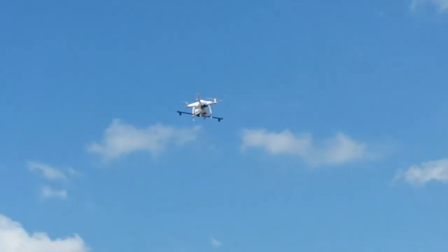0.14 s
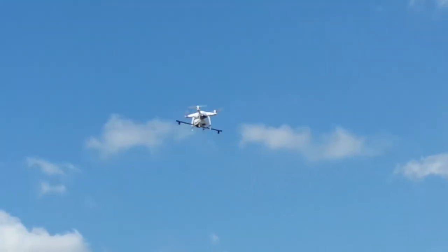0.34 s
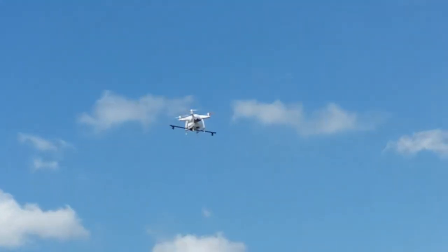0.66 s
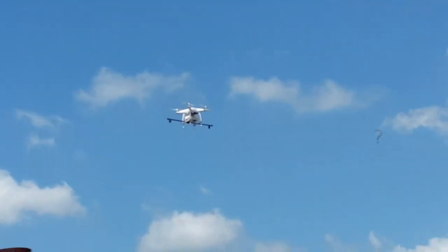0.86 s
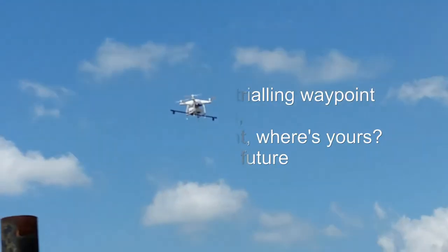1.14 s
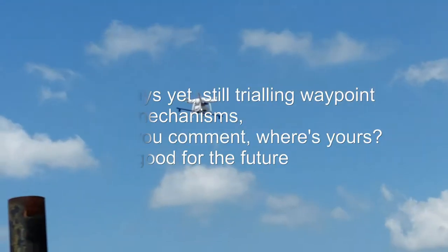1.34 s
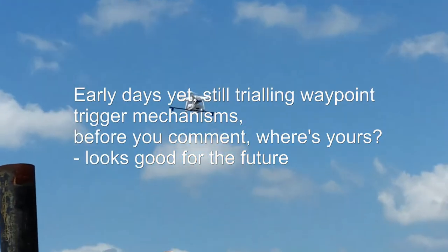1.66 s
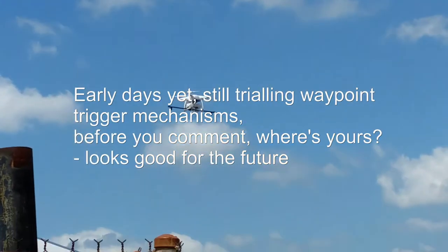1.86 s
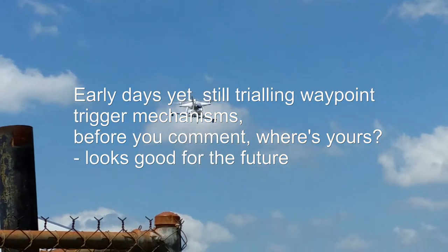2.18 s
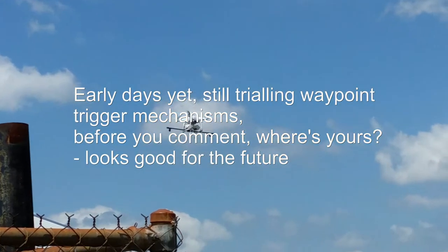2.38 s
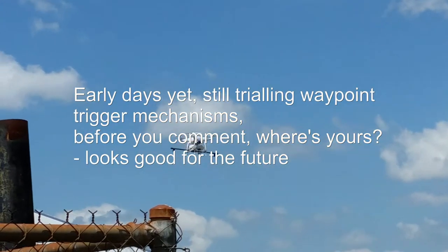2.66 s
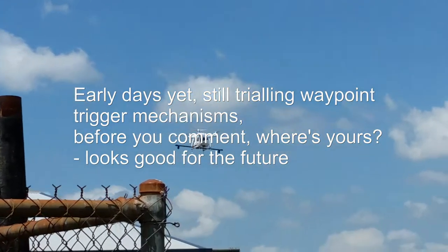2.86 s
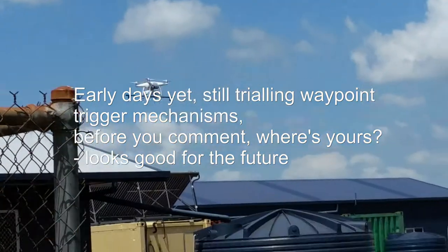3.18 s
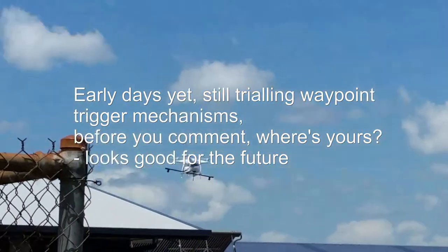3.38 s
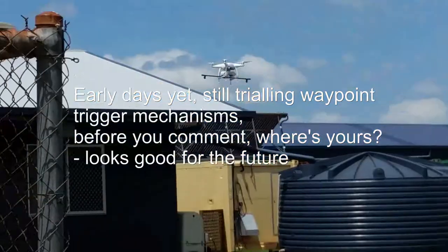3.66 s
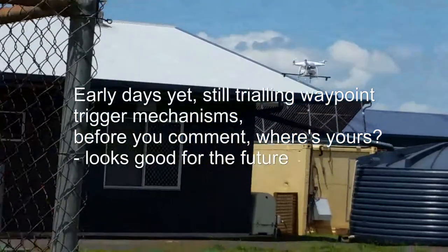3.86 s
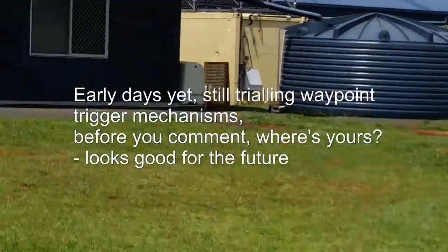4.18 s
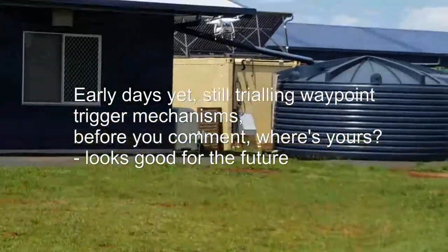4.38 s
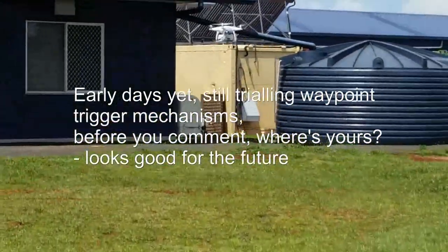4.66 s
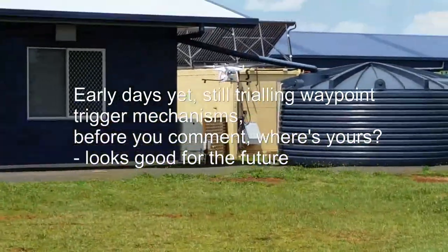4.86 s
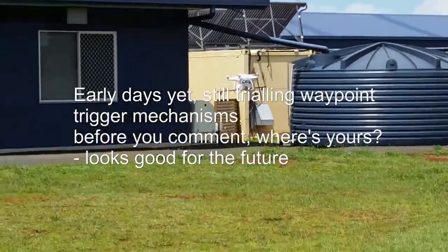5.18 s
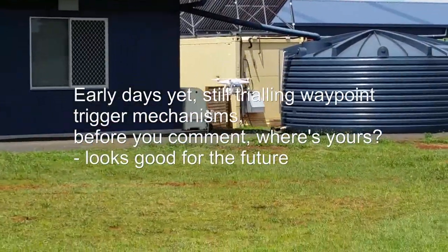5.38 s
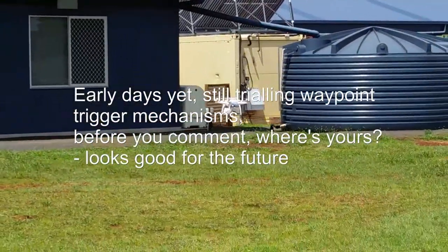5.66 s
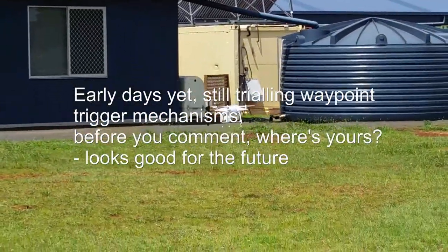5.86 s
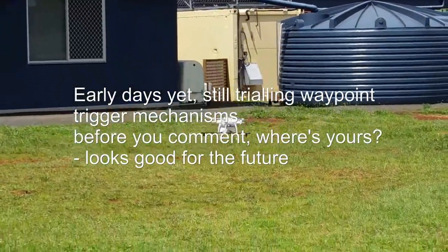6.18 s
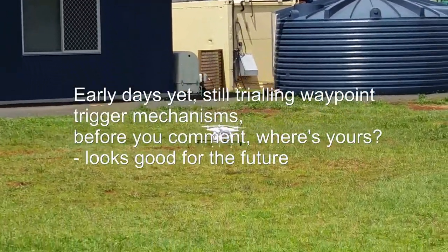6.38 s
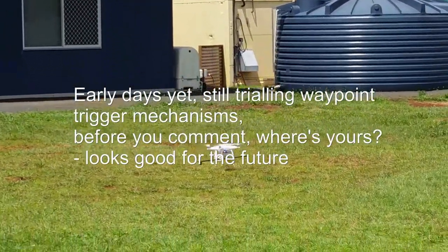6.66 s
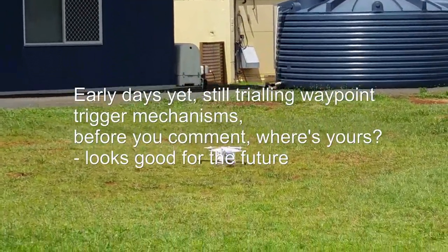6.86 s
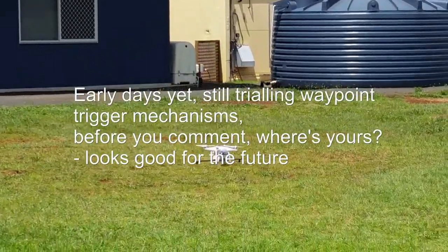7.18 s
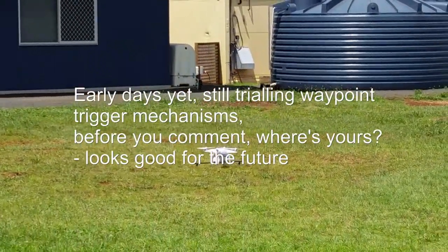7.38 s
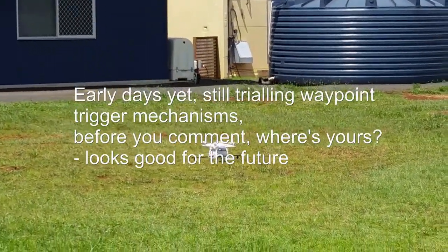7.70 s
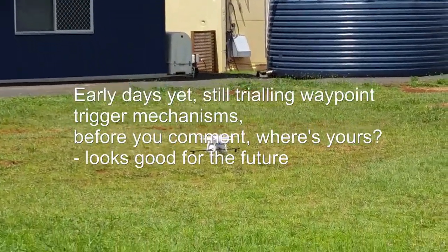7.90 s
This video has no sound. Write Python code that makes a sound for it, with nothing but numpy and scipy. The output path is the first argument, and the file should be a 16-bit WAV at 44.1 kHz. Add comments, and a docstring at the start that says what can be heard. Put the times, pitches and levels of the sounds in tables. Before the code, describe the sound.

The buzzing propellers of a small drone waver outdoors and wind down on landing, while gusts buffet the microphone.

```python
"""Over a lawn, a few metres away, a small four-rotor drone sinks, touches down and throttles back.
Each rotor hums at harmonics of its wavering blade rate and hisses at the tips; the motor housings ring.
The ground echo interferes with the direct sound, a comb filter that shifts as the craft descends.
Wind buffets the left and right microphone each on its own; a bird chirps once over a distant hiss."""
import sys
import numpy as np
from scipy import signal
from scipy.fft import rfft, irfft, next_fast_len
from scipy.io import wavfile
from scipy.ndimage import map_coordinates

SR = 44100
rng = np.random.default_rng(int(sys.argv[2]) if len(sys.argv) > 2 else 0)


def wrap_up_sound(samples):
    """Save the sound to the file named by the first command line argument, as 16-bit audio."""
    columns = np.atleast_2d(samples).T
    # keep every value between -1 and 1, then stretch to whole-number steps
    tamed = np.clip(columns, -1, 1)
    steps = np.round(tamed * 32767).astype(np.int16)
    wavfile.write(sys.argv[1], SR, steps)


N = 354123
HOVER_HZ = 230   # reference blade rate
STEP = 40   # samples between the values of a slow curve
SLOW_TIME = np.arange(N // STEP + 2) * STEP / SR


def from_db(db):
    """Amplitude ratio of a level in decibels."""
    return 10 ** (np.asarray(db) / 20)


def rms_one(x):
    """Normalisation to unit rms."""
    return x / np.sqrt(np.mean(x ** 2) + 1e-20)


def in_time(rows):
    """Linear interpolation of a table's columns at every sample."""
    times, *columns = np.transpose(rows)
    return [np.interp(np.arange(N) / SR, times, column) for column in columns]


def filled(slow):
    """Linear interpolation of a slow curve at every sample."""
    return np.interp(np.arange(N) / STEP, np.arange(len(slow)), slow)


def drift(corner_hz):
    """Random modulation: a slow curve of unit rms, from noise through two one-pole low-passes."""
    pole = np.exp(-2 * np.pi * STEP * corner_hz / SR)
    noise = rng.standard_normal(len(SLOW_TIME) + 2000)
    return rms_one(signal.lfilter([1], [1, -2 * pole, pole * pole], noise)[2000:])


def coloured(x, points, column=1):
    """Spectral shaping by a table of gain against frequency."""
    size, table = next_fast_len(N + 4096), np.array(points)
    log_hz = np.log(np.arange(size // 2 + 1) * SR / size + 1)
    gain = from_db(np.interp(log_hz, np.log(table[:, 0]), table[:, column]))
    return irfft(rfft(x, size) * gain, size)[..., :N]


def delayed(x, lag_s):
    """Propagation delay, constant or varying."""
    return np.interp(np.arange(N) - lag_s * SR, np.arange(N), x)


def resonance(x, hz, width_hz):
    """Two-pole resonator with unit peak gain."""
    r = np.exp(-np.pi * width_hz / SR)
    gain = (1 - r * r) / 2
    return signal.lfilter([gain, 0, -gain], [1, -2 * r * np.cos(2 * np.pi * hz / SR), r * r], x)


def glides(rows):
    """Linear frequency sweeps under Hann envelopes."""
    out = np.zeros(N)
    for start_s, length_s, start_hz, end_hz, db in rows:
        n, at = round(length_s * SR), round(start_s * SR)
        phase = 2 * np.pi * np.cumsum(np.linspace(start_hz, end_hz, n)) / SR
        out[at:at + n] += from_db(db) * np.hanning(n) * np.sin(phase)
    return out


def blade_rates():
    """Blade-passing frequencies: each swings as the craft balances, and the throttle scales all four."""
    # one list per rotor, at flying throttle: (time [s], blade rate [Hz])
    rotors = [
        [(0, 210), (.34, 195), (.7, 224), (.9, 218.5), (1.1, 225), (1.42, 219.5), (1.72, 218), (2.1, 200.5),
         (2.4, 214), (2.78, 215.5), (2.95, 221), (3.15, 221.5), (3.4, 214.5), (3.7, 229), (3.97, 232),
         (4.3, 230), (4.45, 231.5), (4.62, 228), (4.78, 224.5), (5.2, 235.5), (5.5, 235), (5.65, 228.5),
         (5.82, 232), (6, 225.5), (6.23, 231), (6.6, 229), (7.03, 228)],
        [(0, 219.5), (.26, 228), (.52, 223.5), (.72, 228.5), (.86, 226.5), (1, 228.5), (1.25, 222),
         (1.45, 226.5), (1.65, 225), (2.2, 228.5), (2.6, 226), (3.08, 224.5), (3.27, 220.5), (3.45, 225),
         (3.65, 230.5), (3.9, 224.5), (4.12, 230), (4.36, 212.5), (4.62, 228), (5.04, 214.5), (5.26, 225),
         (5.52, 226), (5.76, 231), (5.98, 222), (6.25, 232), (6.55, 221.5), (6.9, 229), (7.03, 227)],
        [(0, 241), (.4, 228.5), (.66, 237), (.9, 230.5), (1.2, 226), (1.5, 230.5), (2.1, 233), (2.5, 232),
         (2.75, 226.5), (3.14, 226.5), (3.37, 234.5), (3.55, 228), (3.72, 231), (3.95, 234), (4.1, 233),
         (4.27, 238.5), (4.63, 213.5), (5, 234.5), (5.25, 241), (5.53, 252), (5.83, 238.5), (6.21, 254.5),
         (6.5, 233), (6.7, 237.5), (6.9, 229), (7.03, 230)],
        [(0, 232), (.42, 243), (.62, 242), (.84, 247.5), (1.25, 247.5), (1.6, 241.5), (1.9, 244.5), (2.2, 241),
         (2.7, 245.5), (3, 246), (3.27, 252), (3.62, 244.5), (3.85, 246.5), (4.17, 240), (4.53, 250),
         (4.75, 247), (5, 234), (5.39, 213), (5.73, 229), (6.17, 213), (6.42, 228), (6.8, 226), (6.9, 209),
         (6.97, 206), (7.03, 205)],
    ]
    # cut on touchdown, then eased up: (time [s], share of flying speed [ratio])
    throttle = [(6.94, 1), (7.03, .97), (7.07, .91), (7.14, .88), (7.3, .72), (7.5, .652), (7.78, .665),
                (8.03, .715)]
    rates = []
    for times, hz in map(np.transpose, rotors):
        position = np.interp(SLOW_TIME, times, np.arange(len(times)))
        swing_hz = map_coordinates(hz, [position], order=3, mode="nearest")
        rates.append(filled(swing_hz) * in_time(throttle)[0])
    return rates


def blade_angles(wobble_hz):
    """Phase is the integral of frequency, one cycle per blade pass; the speed control hunts a little."""
    return [2 * np.pi * (np.cumsum(hz + wobble_hz * filled(drift(11.14))) / SR + rng.random())
            for hz in blade_rates()]


def rotor_hum(angles, flutter_db, rough_db):
    """Periodic blade passes radiate a harmonic series; stirred air modulates each partial's amplitude."""
    # partials of one rotor: (multiple of the blade rate [ratio], level [dB])
    partials = [(.5, -17), (1, -2.8), (2, -2.5), (3, -6), (4, -4.5), (5, -9.5), (6, -11), (7, -12.5),
                (8, -11.5), (9, -15.5), (10, -18), (11, -23)]
    # shading of the far rotors by the body: (time [s], level of rotor 1, 2, 3, 4 [dB])
    shading = [(.4, -11.5, -3.5, -3.5, -13), (.9, -9.5, -4.5, -5, -14.5), (1.8, -14.5, -7.5, -7, -13.5),
               (2.6, -15.5, -6, -8.5, -15.5), (3.6, -11, -6, -5.5, -12), (4.3, -12.5, -6.5, -6.5, -10),
               (5.3, -10, -4, -11, -8.5), (6.4, -7.5, -1.5, -8, -6), (7.02, -5.5, -5.5, -14, -6),
               (7.07, -11.5, -12.5, -3, -1), (7.4, -18, -8, -13, -2)]
    # the low harmonics swell and thin: (time [s], gain of harmonic 1, 2, 3 [dB])
    low_harmonics = [(0, 6, -0.5, -4), (.8, 0.5, -4, 0), (1.3, 5, -2.5, 4.5), (2.2, -2, 3, 0.5),
                     (3, -8, 2.5, 1), (3.8, -4.5, 2.5, -3.5), (4.6, -3.5, 0, 1.5), (5.5, 0.5, -1, 3),
                     (6.3, -2.5, -7, -4), (6.9, 6.5, -3.5, 2.5)]
    # how strongly each rotor's fundamental arrives: (gain [dB])
    fundamentals = [1.5, -6, 2.5, 3]
    swells = dict(zip((1, 2, 3), from_db(in_time(low_harmonics))))
    out = 0
    for angle, rotor_db, hz, first_db in zip(angles, in_time(shading), blade_rates(), fundamentals):
        tones = 0
        for multiple, db in partials:
            level_db = db + first_db * (multiple == 1) + flutter_db * drift(4.9) + rough_db * drift(25)
            amplitude = swells.get(multiple, 1) * filled(from_db(level_db))
            tones += amplitude * np.sin(multiple * angle + 2 * np.pi * rng.random())
        speed_db = 10 * np.log2(hz / HOVER_HZ)   # a faster rotor is louder
        out += from_db(rotor_db + speed_db) * tones
    return out


def blade_noise(angles, spectrum, blade_depth, turn_depth, coherence):
    """Noise modulated by each pass, one blade more than the other; partly coherent left and right."""
    swells = np.array([np.exp(blade_depth * np.cos(a) + turn_depth * np.cos(a / 2)) for a in angles])
    envelope = np.sqrt(np.sum(swells ** 2, axis=0))   # incoherent sources add in power
    shared, left, right = rng.standard_normal((3, N))
    noise = np.sqrt(coherence) * shared + np.sqrt(1 - coherence) * np.array([left, right])
    return rms_one(coloured(envelope * noise, spectrum))


def ground_echo(direct):
    """Reflection from grass, which absorbs treble; the path difference shrinks as the craft sinks."""
    # reflected path: (time [s], lag [ms], strength [ratio])
    reflection = [(0, 3.48, .3), (1, 3.22, 0.34), (2, 2.76, 0.06), (2.9, 2.08, 0.06), (3.4, 1.78, 0.22),
                  (4.3, 1.385, 0.3), (5.1, 1.16, 0.49), (5.5, 0.98, 0.29), (6.1, 0.72, 0.12),
                  (6.7, 0.47, 0.1), (7, 0.35, 0.4), (8.03, 0.46, 1)]
    lag_ms, strength = in_time(reflection)
    dull = signal.sosfilt(signal.butter(1, 3500, fs=SR, output="sos"), direct)
    return strength * np.array([delayed(side, lag_ms / 1000) for side in dull])


def motor_whine(angles, flicker_db, bearing_noise):
    """Forced resonance: blade-pass pulses and bearing noise ring two modes of the motor housings."""
    # housing modes: (frequency [Hz], bandwidth of each filter stage [Hz], level [dB])
    modes = [(5415, 100, 0), (5715, 120, 0)]
    # brief flares of the upper mode: (time [s], rise [dB])
    flares = [(.12, 6), (.56, 6), (.97, 5), (1.24, 5), (1.95, 5), (2.19, 10), (3.1, 7), (3.46, 7),
              (3.8, 11)]
    pulses = rms_one(sum(np.sin(45.5 * a) / (np.sin(a / 2) + 1e-9) for a in angles))   # 45 harmonics
    force = pulses + bearing_noise * rng.standard_normal(N)
    rings = []
    for hz, width_hz, db in modes:
        ring = rms_one(resonance(resonance(force, hz, width_hz), hz, width_hz))
        rings.append(filled(from_db(db + flicker_db * drift(7.4))) * ring)
    lower, upper = rings
    flare_db = sum(db * np.exp(-((SLOW_TIME - at_s) / 0.048) ** 2 / 2) for at_s, db in flares)
    return lower + from_db(filled(flare_db)) * upper


def tip_hiss(angles, split_hz):
    """Directivity: the tips beam their hiss, so it swings with tilt; its top fades as the blades slow."""
    # tip noise: (frequency [Hz], relative spectral density [dB])
    spectrum = [(3000, -16), (6000, -19.5), (10000, -1.5), (13000, -10.5), (16000, -15.5)]
    # hiss beamed at the listener: (time [s], level [dB])
    beam = [(0, -43.5), (.13, -41), (.2, -44.5), (.55, -46), (.72, -40.5), (.87, -42.5), (1.22, -44),
            (1.55, -48.5), (1.68, -42.5), (1.82, -46.5), (2.2, -47), (2.33, -43), (2.64, -43.5),
            (2.78, -45), (3.4, -48), (3.52, -41.5), (3.8, -39.5), (3.95, -44.5), (4.02, -46.5), (4.25, -45),
            (5.15, -47.5), (5.57, -46), (5.8, -49.5), (6.1, -51), (6.2, -44), (6.99, -40), (7.14, -48),
            (7.3, -59.5), (7.58, -51.5), (8.03, -49)]
    hiss = blade_noise(angles, spectrum, blade_depth=0.44, turn_depth=0.17, coherence=0.47)
    top = signal.sosfilt(signal.butter(2, split_hz, "high", fs=SR, output="sos"), hiss)
    speed = np.mean(blade_rates(), axis=0) / HOVER_HZ
    level_db = in_time(beam)[0] + filled(drift(7.3))
    return from_db(level_db) * (hiss + 2.5 * speed ** 8.5 * top)


def drone():
    """Superposition of the craft's sources; hum and blade noise interfere with their ground echo."""
    # source gains over the flight: (time [s], hum [dB], blade noise [dB], whine [dB])
    flight = [(0, -43.5, -46, -63), (2, -40.5, -49.5, -62.5), (4, -39.5, -50.5, -63.5), (5, -40, -53, -60),
              (6, -41, -49.5, -60.5), (6.5, -41, -47.5, -56.5), (6.85, -45, -49.5, -54),
              (6.99, -44.5, -58, -52), (7.05, -54.5, -55, -53), (7.3, -60, -59, -58), (7.55, -52, -60, -67),
              (8.03, -52, -60, -62)]
    # broadband blade noise: (frequency [Hz], relative spectral density [dB])
    spectrum = [(150, -44.5), (400, -0.5), (1000, -3.5), (2000, 0), (3500, -6.5), (6000, -56),
                (9000, -18.5)]
    hum_gain, swish_gain, whine_gain = from_db(in_time(flight))
    angles = blade_angles(wobble_hz=0.35)
    hum = hum_gain * rotor_hum(angles, flutter_db=1.8, rough_db=0.9)
    swish = swish_gain * blade_noise(angles, spectrum, blade_depth=0.42, turn_depth=0.084, coherence=0.67)
    motors = whine_gain * motor_whine(angles, flicker_db=3, bearing_noise=2.3) + motor_slides(flicker_db=3)
    left, right = hum + swish + ground_echo(hum + swish) + tip_hiss(angles, split_hz=15400) + motors
    return np.array([left, delayed(right, lag_s=7.7e-5)])   # sound reaches the right side later


def distant_hiss(level_db):
    """Ambient noise: steady, and incoherent between left and right."""
    # outdoor background: (frequency [Hz], relative spectral density [dB])
    spectrum = [(150, 9), (1300, 1), (2500, 1), (5000, -2), (10000, -40.5), (16000, -15)]
    return from_db(level_db) * rms_one(coloured(rng.standard_normal((2, N)), spectrum))


def wind(gust_db, lee_db):
    """Turbulent pressure, independent at each microphone; the strongest eddies are sharp-crested pulses."""
    # wind on the left (the right lies partly in the lee): (time [s], level [dB])
    strength = [(0, -56.5), (1.1, -52.5), (2.4, -56.5), (2.9, -44.5), (3.4, -35), (4.05, -36), (4.3, -40.5),
                (4.8, -47.5), (5.3, -44.5), (6.1, -54), (6.4, -40.5), (6.85, -28), (7.2, -33), (7.6, -33.5),
                (7.8, -25.5), (8.03, -29.5)]
    # turbulence: (frequency [Hz], relative spectral density [dB])
    spectrum = [(15, -10), (33, 5), (55, 5.5), (85, 7), (130, -3.5), (200, -10.5), (320, -30), (600, -64),
                (1500, -98.5)]
    # single eddies: (time [s], level [dB], frequency [Hz], side [0 left, 1 right])
    buffets = [(0.552, -31, 79.6, 0), (2.713, -28.5, 96, 0), (3.329, -27, 131, 0), (3.659, -25, 140, 1),
               (4.052, -20, 103, 0), (4.222, -19.5, 181, 1), (5.221, -23.5, 68.6, 1), (6.425, -22.5, 79, 0),
               (6.609, -18.5, 101, 0), (6.637, -23, 61.7, 0), (6.707, -23, 83, 0), (6.788, -16, 99, 0),
               (6.871, -19, 99, 1), (6.904, -16.5, 113, 1), (6.932, -15.5, 135, 0), (7.188, -15, 70.5, 0),
               (7.4, -19, 89, 0), (7.582, -22.5, 121, 0), (7.705, -14.5, 119, 0), (7.79, -10.5, 120, 0),
               (7.811, -19, 76.6, 1), (7.905, -22.5, 172, 0), (7.929, -20, 126, 0), (7.985, -18, 140, 0)]
    gusts = np.array([from_db(in_time(strength)[0] + side_db + gust_db * filled(np.tanh(drift(18))))
                      for side_db in (0, lee_db)])
    noise = rng.standard_normal((2, N))
    out = coloured(gusts * noise, spectrum) / np.std(coloured(noise, spectrum))
    for crest_s, db, hz, side in buffets:
        t = np.arange(-1.8 / hz, 2.4 / hz, 1 / SR)
        swing = np.exp(-(2 * hz * t) ** 2) * np.cos(2 * np.pi * hz * t - 0.6)
        crest = 0.57 * np.exp(-(6.6 * hz * t) ** 2)
        at = round((crest_s + t[0]) * SR)
        out[round(side), at:at + len(t)] += from_db(db) * (swing + crest)[:N - at]
    return out


def bird():
    """Frequency modulation: three quick swept tones make one chirp."""
    # notes: (time [s], duration [s], start frequency [Hz], end frequency [Hz], level [dB])
    notes = [(1.47, 0.019, 2520, 2560, -49), (1.487, .02, 2700, 3040, -44),
             (1.528, 0.058, 2680, 2510, -47.5)]
    return glides(notes)


def motor_slides(flicker_db):
    """A motor's whistle glides in frequency as the load comes off and back on."""
    # whistles: (time [s], duration [s], start frequency [Hz], end frequency [Hz], level [dB])
    whistles = [(6.88, .15, 5830, 5700, -46), (6.96, .17, 5740, 5600, -46.5), (7.05, .22, 5640, 5580, -48),
                (7.21, .07, 5460, 5440, -50), (7.62, .14, 5570, 5730, -52), (7.83, .14, 5400, 5600, -50)]
    return glides(whistles) * filled(from_db(flicker_db * drift(30)))


def scene():
    """Superposition: airborne sound, coloured apart left and right, plus wind directly on the capsules."""
    # overall tone colour, with a near-silent band around 6-9 kHz:
    # (frequency [Hz], left gain [dB], right gain [dB])
    tone_colour = [(100, 1.5, 2.5), (1640, -2.5, -4.5), (2600, 2, -5.5), (3270, -2, -7.5), (3990, 10, -8),
                   (4765, 7, -1.5), (5420, -7.5, -1), (6400, -44, -4), (7880, -77, -56), (8100, -63, -87),
                   (8996, -14, -33), (9750, -8, -23), (11060, 4, -4.5), (12850, 6, 7.5), (14550, -1.5, 9.5),
                   (16100, -5, 15.5)]
    airborne = drone() + distant_hiss(level_db=-52.5) + bird()
    heard = np.array([coloured(airborne[side], tone_colour, column=side + 1) for side in range(2)])
    return heard + wind(gust_db=6.5, lee_db=-3)


def record(dry):
    """Band limiting: the deepest bass rolls off and the top is cut steeply."""
    lighter = signal.sosfilt(signal.butter(1, 25, "high", fs=SR, output="sos"), dry)
    return signal.sosfilt(signal.cheby2(22, 70, 15900, fs=SR, output="sos"), lighter)


dry = scene()
out = record(dry)
wrap_up_sound(out)
```